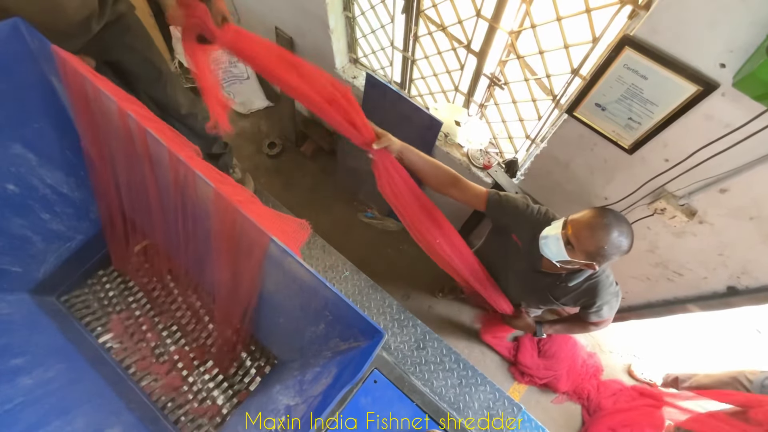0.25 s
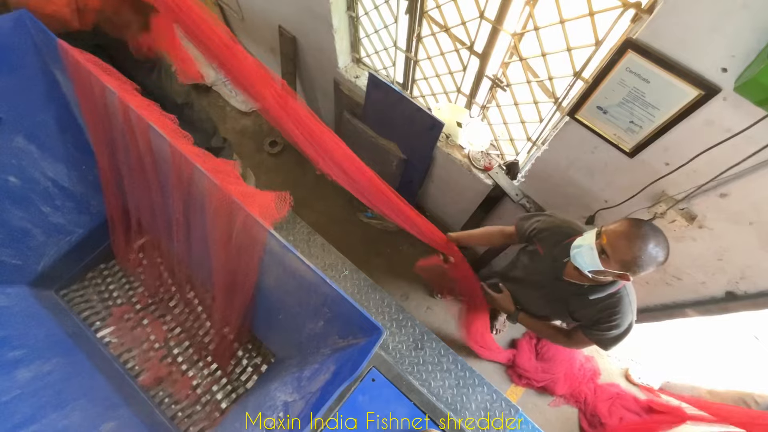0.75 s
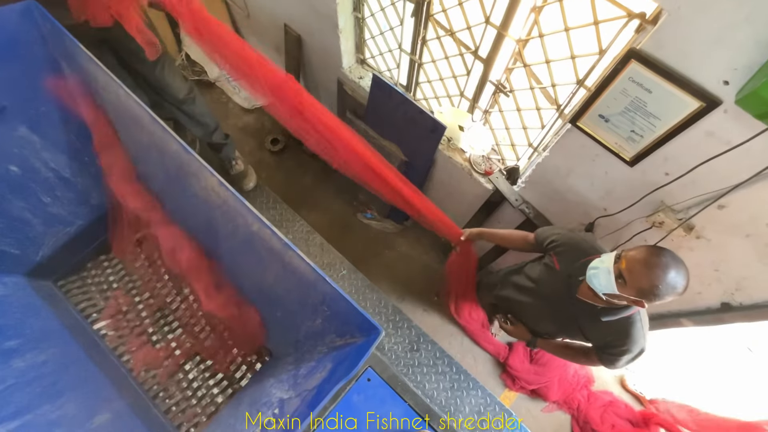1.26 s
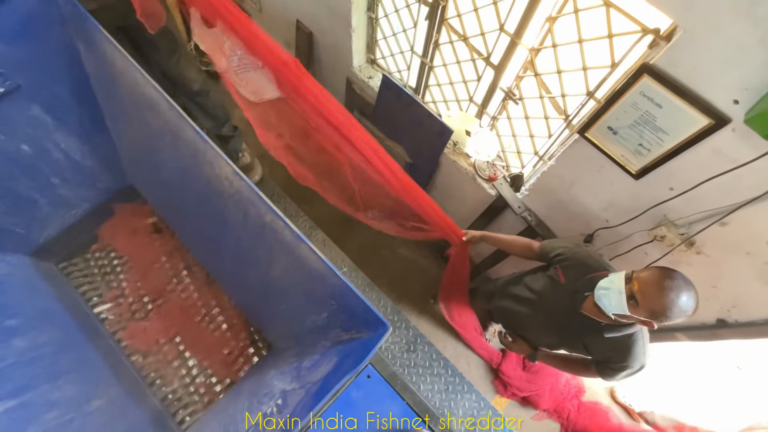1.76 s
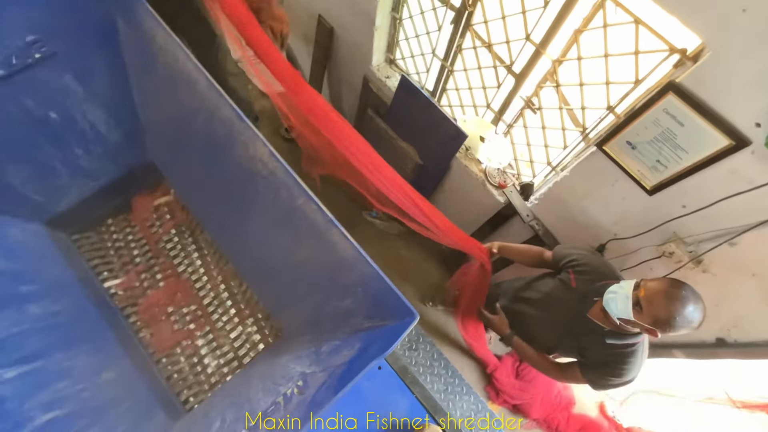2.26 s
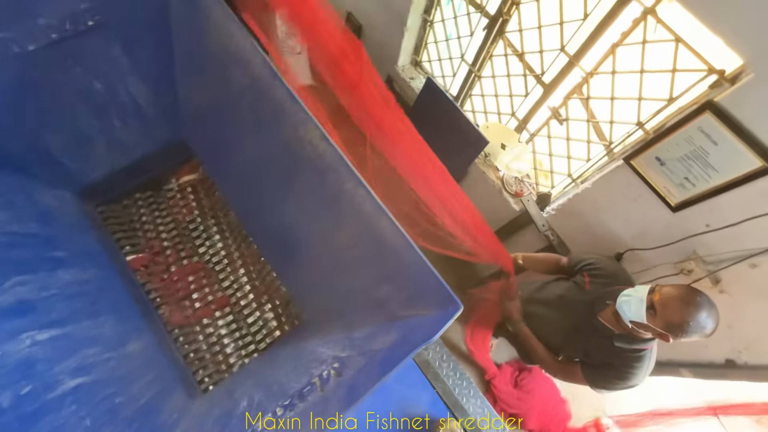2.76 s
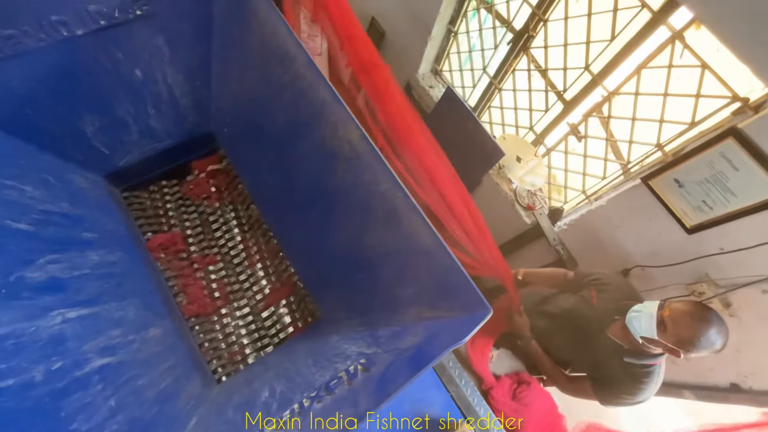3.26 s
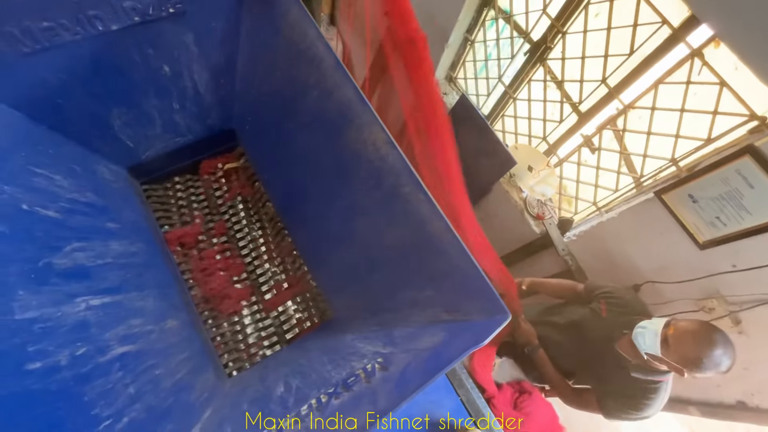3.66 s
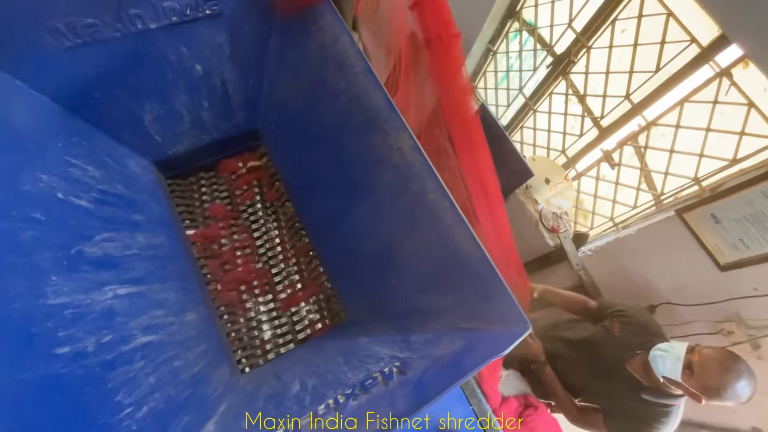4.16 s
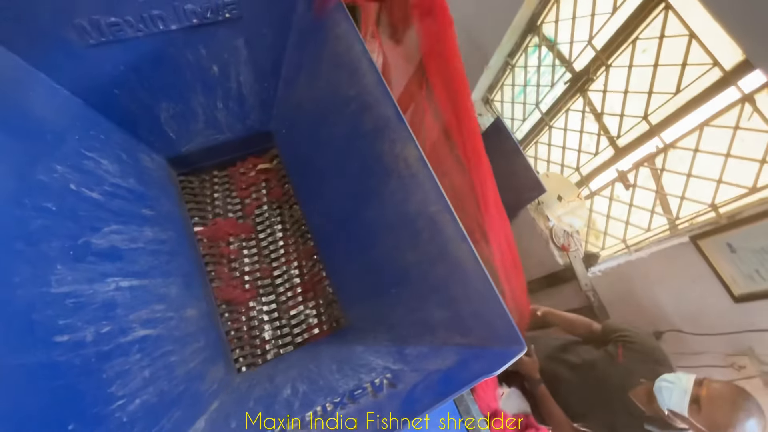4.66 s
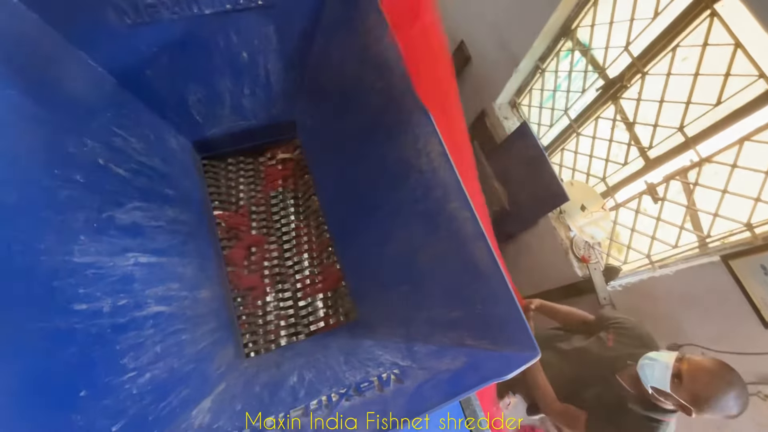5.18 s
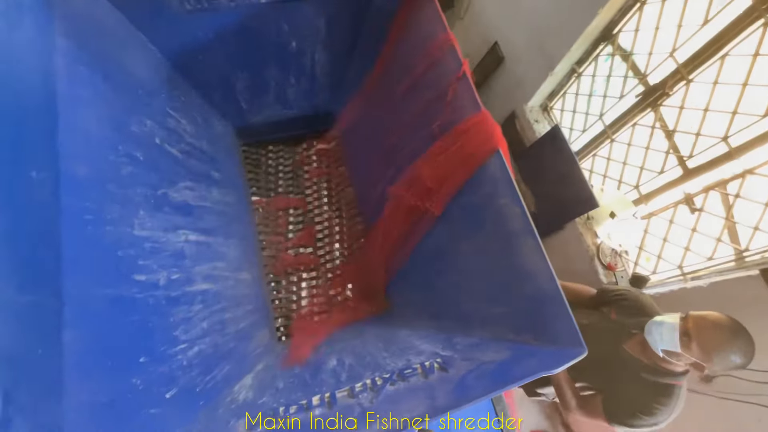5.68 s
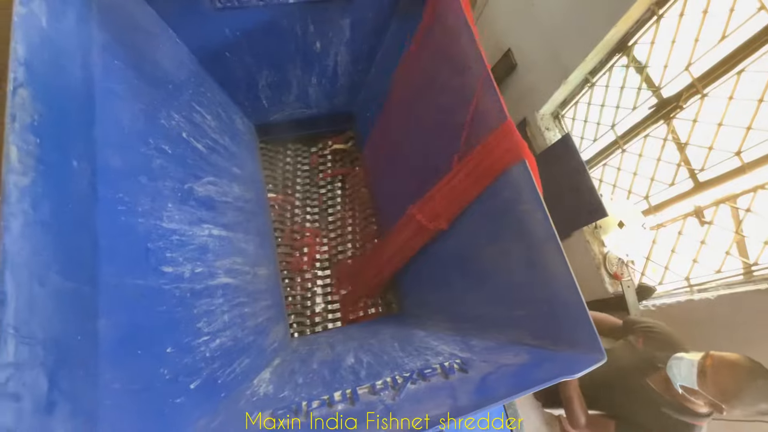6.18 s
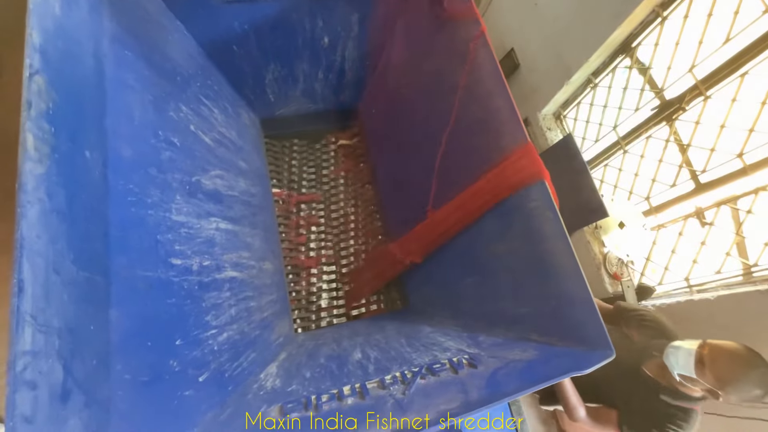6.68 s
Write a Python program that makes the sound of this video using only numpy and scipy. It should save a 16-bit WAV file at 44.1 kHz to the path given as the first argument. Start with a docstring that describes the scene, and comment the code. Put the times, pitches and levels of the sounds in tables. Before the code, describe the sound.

An industrial shredder drones low and throbs unevenly, scraping and chopping nylon netting under a faint, buzzing high whine, with knocks and small snaps.

```python
"""A twin-shaft shredder runs in a small workshop, heard from just above its steel hopper.
Wandering sines make the gearbox drone, throb and sing; shaped noise and decaying modes make the walls
rumble and knock. Evenly spaced tones near 5 kHz make the motor drive whine.
Nylon netting dragged over the rim hisses and crackles as noise and clicks; now and then a strand snaps."""
import sys
import numpy as np
from scipy import signal
from scipy.fft import rfft, irfft
from scipy.io import wavfile
from scipy.ndimage import map_coordinates

SR = 44100
rng = np.random.default_rng(int(sys.argv[2]) if len(sys.argv) > 2 else 0)


def persist_wave(psi):
    """Save psi, clipped to +-1, as 16-bit WAV."""
    counts = np.round(np.clip(psi, -1, 1) * 32767).astype(np.int16)
    wavfile.write(sys.argv[1], SR, np.atleast_2d(counts).T)


N = 305604
TIME = np.arange(N) / SR
BINS_HZ = np.fft.rfftfreq(N, 1 / SR)

DRONE_HZ, SLOT_HZ = 108, 714
SWITCH_HZ, SPACING_HZ = 5039.7, 80.7
BAND_LIMIT_HZ = 15800

# Throbs of the drone. Each row: centre in seconds, relative peak in dB.
THROBS = [(0.118, -20), (0.16, -12), (0.247, -8), (0.416, -16), (0.495, -16), (0.642, -16), (0.926, -16.5),
          (1.014, -15), (1.103, -12), (1.553, -14), (1.654, -11.5), (1.702, -10.5), (1.85, -12),
          (1.951, -9), (2.022, -17), (2.109, -10.5), (2.179, -23), (2.422, -15), (2.467, -14.0),
          (2.557, -19), (2.671, -12), (2.729, -11), (2.822, -8.5), (2.885, -8), (2.972, -23), (3.083, -19),
          (3.143, -14.5), (3.186, -20), (3.23, -15), (3.274, -14), (3.319, -14), (3.413, -7.5),
          (3.497, -17), (3.554, -11.5), (3.63, -10), (3.684, -11.0), (3.791, -9.5), (3.881, -12),
          (4.031, -13.5), (4.096, -27), (4.143, -9), (4.274, -14), (4.434, -16.0), (4.477, -12.5),
          (4.571, -9.5), (4.803, -9.5), (4.881, -10.5), (4.983, -12.5), (5.069, -8.5), (5.172, -11.5),
          (5.238, -12.0), (5.34, -10.5), (5.514, -18), (5.584, -22), (5.627, -16), (5.878, -17),
          (5.922, -20), (6.032, -11.5), (6.087, -12), (6.132, -18), (6.204, -14.0), (6.245, -13.5),
          (6.329, -15), (6.383, -10.5), (6.473, -14.5), (6.584, -19), (6.724, -10.5), (6.789, -16),
          (6.836, -18), (6.91, -12.5)]
# Hollow boom of the hopper. Each row: frequency in Hz, relative density in dB.
BOOM_COLOUR = [(28, -22), (52, -8.5), (75, 2), (100, 6.5), (126, 6), (170, 1), (300, -80)]
# Load on the cutters, driving rumble, grind and low gears. Each row: time in seconds, relative level in dB.
LOAD = [(0, -18.5), (.8, -21.5), (1.55, -19), (1.9, -18.5), (2.4, -19), (2.65, -19), (3.45, -17.5),
        (3.7, -20), (4.5, -21), (5.35, -24.5), (5.8, -25.5), (6.05, -20.5), (6.4, -22.5), (6.92, -23)]
# Tones of the gear train. Each row: frequency in Hz, level in dB before waver and load.
GEAR_TONES = [(97.7, -30), (117.8, -28), (126.9, -25.5), (164, -36.5), (193.7, -32.5), (293.8, -40.5),
              (319, -35.5), (350, -35), (484, -43), (892, -43)]
# Slot tone of the motor. Each row: time in seconds, relative level in dB.
SLOT_LEVEL = [(0, -40), (.8, -40.5), (2.08, -38.5), (2.5, -46.5), (3.65, -34), (4.45, -40.5), (4.7, -50),
              (5.8, -48), (6.35, -39), (6.92, -51.5)]
# Shaking walls. Each row: frequency in Hz, relative density in dB.
RUMBLE_COLOUR = [(90, -23), (150, -2.5), (225, 0), (270, -4), (335, -1.5), (390, -5.5), (470, -3.5),
                 (560, -13.5), (700, -31), (1200, -88)]
# Scraping and chopping. Each row: frequency in Hz, relative density in dB.
GRIND_COLOUR = [(350, -15.5), (600, 3), (800, 0.5), (1100, -3.5), (1350, -3), (1880, -3), (2900, -5),
                (4200, -12.5), (6500, -11.5), (9000, -18.5), (15500, -98)]
# Teeth dragging through netting. Each row: centre in seconds, swell of the grinding in dB.
SCRAPES = [(.59, 3.5), (1.93, 5), (2.43, 4.5), (2.747, 3.5), (3.22, 2.5), (3.54, 2), (6.377, 3.5)]
# Ringing of the cutter discs. Each row: frequency in Hz, width between -6 dB points in Hz, relative level in dB.
DISC_RINGS = [(1311, 27, -49), (1722, 180, -43.5), (2236, 32, -51.5), (3300, 1000, -44)]
# A thick wad churning between the shafts. Each row: time in seconds, level in dB.
CHURN_LEVEL = [(2.48, -56), (2.6, -21), (3.02, -25.5), (3.45, -25), (4.5, -33), (4.8, -56)]
# Its resonances. Each row: frequency in Hz, width between -6 dB points in Hz, relative level in dB.
CHURN_RINGS = [(156, 68, 0), (196, 61, -8), (330, 81, -7.5)]
# Bundles of strands giving way. Each row: start in seconds, level at onset in dB.
CRUNCHES = [(2.562, -26.5), (3.357, -23.5)]
# Cutters knocking. Each row: start in seconds, relative level in dB, most excited frequency in Hz.
KNOCKS = [(1.636, -15, 200), (1.828, -8, 200), (3.39, -12, 332), (3.549, -10.5, 410)]
# Modes of the hopper walls. Each row: frequency in Hz, relative level in dB, 60 dB decay in seconds.
HOPPER_MODES = [(111, -4, 0.18), (176, 6.5, 0.087), (221, 8, 0.12), (369, 7, 0.053), (522, 2, 0.034)]
# Strands squeaking between the cutters. Each row: start in seconds, mean pitch in Hz, length in seconds,
# relative level in dB.
SQUEAKS = [(2.557, 1880, 0.05, -31.5), (3.356, 1160, 0.053, -33.5), (5.4, 1730, 0.28, -45)]
# Strands snapping. Each row: start in seconds, relative level in dB.
SNAPS = [(0.757, -25), (1.089, -16), (1.245, -19), (1.341, -23), (2.699, -23), (4.12, -27), (6.511, -20),
         (6.622, -21)]
# Netting sliding over steel. Each row: time in seconds, relative level in dB.
SLIDE = [(0, -39), (1.2, -38), (1.9, -32), (2.3, -30.5), (2.55, -39), (3, -42.5), (4.9, -43.5),
         (5.35, -47.5), (5.8, -45), (5.95, -32.5), (6.5, -35.5), (6.92, -35)]
# Hiss of the threads. Each row: frequency in Hz, relative density in dB.
HISS_COLOUR = [(1200, -41), (2500, 2), (3300, -6), (4300, 7.5), (6000, 8.5), (7800, 11), (9800, 10),
               (11800, 6.5), (15700, 4)]
# Drive tones, low to high; the middle three are the main ones and swell and fade in the standing waves
# of the room. Each row: time in seconds, relative level in dB.
WHINE_BOTTOM = [(3.3, -55), (4.05, -45), (5.4, -50), (5.9, -55)]
WHINE_LOW = [(0, -50), (1.5, -52), (1.72, -38.5), (2.1, -36.5), (2.3, -47), (2.93, -36.5), (3.3, -41.5),
             (3.72, -51), (3.98, -39), (4.38, -32.5), (4.72, -47), (5.38, -39), (5.62, -51), (5.85, -42),
             (6.3, -34), (6.92, -59)]
WHINE_MIDDLE = [(0, -43), (1, -44), (1.98, -37), (2.19, -39), (2.32, -35), (2.62, -43), (2.8, -41),
                (2.98, -50), (3.42, -55), (3.66, -34), (4.25, -40.5), (4.8, -36), (5.3, -47), (5.62, -58),
                (5.92, -35), (6.33, -36), (6.92, -55)]
WHINE_HIGH = [(0, -37.5), (.75, -35.5), (1.45, -38), (1.63, -53), (1.8, -35.5), (2.14, -39), (2.3, -54),
              (3, -50), (3.15, -35.5), (3.42, -34), (3.65, -44), (4.25, -51), (4.95, -38.5), (5.5, -42.5),
              (5.65, -51)]
WHINE_TOP = [(0, -43), (1.4, -54), (2.68, -42.5), (3.9, -50), (5.8, -57), (6.15, -45)]
# Weaker tones of the drive. Each row: frequency in Hz, relative level in dB.
SIDEBANDS = [(4878, -52.5), (5201, -49)]
# Likeness of the two microphone ports. Each row: frequency in Hz, coherence from 0 to 1.
MACHINE_SAME = [(110, 0.98), (220, 0.96), (330, 0.73), (600, 0.38), (950, 0.22), (2000, 0.39), (2700, 0.64),
                (5000, 1), (15000, 1)]
NET_SAME = [(2000, .75), (7000, .8), (8600, 1), (15000, .97)]
# Lead of the left port, negative where the right leads. Each row: frequency in Hz, phase in radians.
LEAD = [(500, 0), (760, -3), (1100, -6.1), (1500, -6.5), (2100, -7.5), (3000, -10.9), (4500, -13.5),
        (5800, -13.4), (7500, -14.3), (8700, -15.6), (10900, -15.8), (12600, -18.5)]
# Balance of the ports. Each row: time in seconds, left over right in dB.
BALANCE = [(0, 0.9), (6.92, -0.1)]


def drone(hum_db=-21.5, throb_db=-1.5, throb_s=0.017, throb_hz=111, scatter=0.063,
          boom_db=-28.0, wander_rad=0.97):
    """The main gear mesh hums; each throb swells it at a slightly different pitch, over a hollow boom."""
    mesh = 2 * np.pi * DRONE_HZ * TIME + wander_rad * drift(1)
    hum = gain_of(hum_db) * np.sin(mesh)
    for (s, db), chance in zip(THROBS, rng.standard_normal(len(THROBS))):
        near = abs(TIME - s) < 4 * throb_s
        t = TIME[near] - s
        off_hz = throb_hz * (1 + scatter * chance) - DRONE_HZ
        swell = gain_of(db + throb_db) * np.exp(-.5 * (t / throb_s) ** 2)
        hum[near] += swell * np.sin(mesh[near] + 2 * np.pi * off_hz * t)
    boom = ports(rng.standard_normal((2, N)), BOOM_COLOUR, MACHINE_SAME)
    return hum + gain_of(boom_db) * boom


def gears(wander_rad=0.99, waver_db=2.0, load_share=0.94,
          slot_db=4.5, slot_waver_db=2.5, slot_wander_rad=2.4):
    """Gear tones waver; the low ones grow under load, and the motor's slot tone sings with a blurred pitch."""
    load = evened(follow(LOAD, load_share))
    tones = 0
    for hz, db in GEAR_TONES:
        level = gain_of(db + waver_db * drift(3.1)) * (load if hz < 2 * DRONE_HZ else 1)
        tones = tones + level * tone(hz, wander_rad, 0.97, lead_at(hz))
    slot_level = follow(SLOT_LEVEL) * gain_of(slot_db + slot_waver_db * drift(16))
    return tones + slot_level * tone(SLOT_HZ, slot_wander_rad, 6.9, 0.86)


def cutters(rumble_db=-26.5, grind_db=-29.0, grind_share=0.48, flutter_db=2.0, scrape_s=0.023,
            chips_per_s=700, spread_db=3.5, clumps_db=2.5, clump_s=.022, clump_hz=400):
    """The discs scrape past each other and ring, chop threads in a clumpy clatter and shake the walls."""
    scrape_db = sum(db * np.exp(-.5 * ((TIME - s) / scrape_s) ** 2) for s, db in SCRAPES)
    rumble = ports(rng.standard_normal((2, N)), RUMBLE_COLOUR, MACHINE_SAME)
    rumble = rumble * gain_of(rumble_db + flutter_db * drift(6.9) + scrape_db / 2)
    chopping = rng.standard_normal((2, N)) + sparse(chips_per_s, spread_db) / 2
    grind = gain_of(grind_db + scrape_db) * ports(chopping, GRIND_COLOUR, MACHINE_SAME)
    grind = patchy(grind + discs(), clumps_db, clump_s, clump_hz)
    return evened(follow(LOAD)) * rumble + evened(follow(LOAD, grind_share)) * grind


def discs():
    """Rubbing, as noise, keeps the resonant steel discs ringing."""
    rubbing = rfft(rng.standard_normal(N))
    rings = 0
    for hz, width_hz, db in DISC_RINGS:
        resonance = 1 / (1 + (2 * (BINS_HZ - hz) / width_hz) ** 2)
        rings = rings + gain_of(db) * evened(irfft(rubbing * resonance, N))
    return placed(rings)


def churn(tugs_per_s=260):
    """The teeth tug at a thick wad in quick, uneven jerks that shake the hopper resonances."""
    tugs = rfft(sparse(tugs_per_s, 0)[0])
    body = 0
    for hz, width_hz, db in CHURN_RINGS:
        resonance = 1 / (1 + 2j * (BINS_HZ - hz) / width_hz) ** 2
        body = body + gain_of(db) * evened(irfft(tugs * resonance, N))
    return placed(follow(CHURN_LEVEL) * evened(body))


def crunches(decay_s=0.047):
    """A bundle of strands gives way at once in a dense, decaying burst of clicks."""
    level = sum(gain_of(db) * (TIME > s) * np.exp(-abs(TIME - s) / decay_s) for s, db in CRUNCHES)
    band = signal.butter(2, [700, 3400], "band", fs=SR, output="sos")
    return placed(level * evened(signal.sosfilt(band, sparse(900, 2)[0])))


def knocks(rise_s=0.002, crunch_db=-15, crunch_s=0.017, focus_db=7):
    """A cutter catches with a short crunch and the walls ring, most strongly near one pitch."""
    t, out = TIME[:SR // 3], np.zeros(N)
    dull = signal.butter(1, [200, 700], "band", fs=SR, output="sos")
    for s, level_db, centre_hz in KNOCKS:
        ring = 0
        for hz, db, t60_s in HOPPER_MODES:
            mode_db = db - focus_db * np.log2(hz / centre_hz) ** 2 - 60 * t / t60_s
            ring = ring + gain_of(mode_db) * np.sin(2 * np.pi * hz * t)
        crunch = evened(signal.sosfilt(dull, rng.standard_normal(len(t))))
        crunch = gain_of(crunch_db) * crunch * np.exp(-t / crunch_s)
        add(out, s, gain_of(level_db) * (ring / 2 + crunch) * (1 - np.exp(-t / rise_s)))
    return placed(out)


def squeaks():
    """Taut nylon slips on steel: a short tone, rough in pitch and broken in level."""
    out = np.zeros(N)
    for s, hz, length_s, db in SQUEAKS:
        count = int(length_s * SR)
        pitch_hz = hz * (1 + .08 * drift(200)[:count])
        slips = evened(gain_of(5 * drift(70)[:count]))
        envelope = 2 * gain_of(db) * signal.windows.tukey(count) * slips
        add(out, s, envelope * np.sin(2 * np.pi * np.cumsum(pitch_hz) / SR))
    return placed(out)


def snaps(level_db=-5, crack_s=0.0049, tail_s=0.013, tail_db=-14, low_hz=6500):
    """A strand breaks: high-passed noise with a fast crack and a weaker, slower tail."""
    t, out = TIME[:SR // 16], np.zeros(N)
    shape = np.exp(-t / crack_s) + gain_of(tail_db) * np.exp(-t / tail_s)
    for s, db in SNAPS:
        add(out, s, gain_of(db + level_db) * shape * rng.standard_normal(len(t)))
    return placed(signal.sosfilt(signal.butter(2, low_hz, "high", fs=SR, output="sos"), out))


def netting(hiss_db=1.5, crackle_db=-6.5, knots_per_s=500, spread_db=7.5, flicker_db=1.6):
    """Countless threads hiss over the steel, and the knots tick as they catch."""
    threads = gain_of(hiss_db) * ports(rng.standard_normal((2, N)), HISS_COLOUR, NET_SAME)
    knots = gain_of(crackle_db) * ports(sparse(knots_per_s, spread_db), HISS_COLOUR, NET_SAME)
    return follow(SLIDE) * gain_of(flicker_db * drift(19.0)) * (threads + knots)


def whine(flutter_db=1.5, ports_db=3, wander_rad=0.82, stray_rad=.4, apart_rad=.7, waver_db=3.5):
    """Switching tones wander together, so their even spacing beats as a buzz; the room favours each in turn."""
    lead, shared = lead_at(SWITCH_HZ), wander_rad * drift(1)
    tones = [(SWITCH_HZ - 3 * SPACING_HZ, WHINE_BOTTOM), (SWITCH_HZ - SPACING_HZ, WHINE_LOW),
             (SWITCH_HZ, WHINE_MIDDLE), (SWITCH_HZ + SPACING_HZ, WHINE_HIGH),
             (SWITCH_HZ + SLOT_HZ, WHINE_TOP)]
    out = 0
    for hz, rows in tones:
        tilt_db = ports_db * np.outer([.5, -.5], drift(0.85))  # left against right
        level = follow(rows) * gain_of(flutter_db * drift(13) + tilt_db)
        out = out + level * tone(hz, stray_rad, 1.6, lead, shared, apart_rad)
    for hz, db in SIDEBANDS:
        out = out + gain_of(db + waver_db * drift(2.9)) * tone(hz, 1, 2.5, lead)
    return np.sqrt(2) * out  # levels as rms


def tone(hz, wander_rad, wander_hz, lead_rad, shared_rad=0, apart_rad=1.0):
    """A wandering sine; standing waves in the room keep shifting its phase between the ports."""
    phase = 2 * np.pi * hz * TIME + shared_rad + wander_rad * drift(wander_hz)
    shift = apart_rad * min(hz / SLOT_HZ, 1) * drift(0.65)
    return np.sin([phase, phase - lead_rad + shift])


def sparse(per_s, spread_db):
    """Two trains of random clicks of rms 1; a larger spread leaves most small and a few large."""
    size = gain_of(spread_db * np.minimum(rng.exponential(1, (2, N)), 4))
    return evened(size * rng.choice([-1, 1], (2, N)) * (rng.random((2, N)) < per_s / SR))


def patchy(pair, depth_db, patch_s, patch_hz):
    """Swells and dips that come and go separately in each part of the spectrum."""
    hz, t, spectrum = signal.stft(pair, SR, nperseg=512, noverlap=384)
    field = rng.standard_normal((200, 600))
    where = np.meshgrid(hz / patch_hz, t / patch_s, indexing="ij")
    swell_db = depth_db * map_coordinates(field, where, order=1, mode="mirror")
    return signal.istft(spectrum * gain_of(swell_db), SR, nperseg=512, noverlap=384)[1][:, :N]


def ports(pair, colour, likeness):
    """Colours two unrelated signals and blends them into what the two microphone ports hear."""
    direct, diffuse = rfft(pair)
    same = np.clip(at_bins(likeness), 0, 1)
    right = (same * direct + np.sqrt(1 - same ** 2) * diffuse) * np.exp(-1j * at_bins(LEAD))
    return evened(irfft(np.array([direct, right]) * gain_of(at_bins(colour)), N))


def placed(x):
    """A single source in the hopper, reaching the right port first."""
    return np.array([x, irfft(rfft(x) * np.exp(-1j * at_bins(LEAD)), N)])


def lead_at(hz):
    """Lead of the left port at one frequency, in radians."""
    return np.interp(hz, *np.transpose(LEAD))


def drift(width_hz):
    """Slow random curve of rms 1: noise at 1000 points a second under a Gaussian low-pass."""
    window = signal.windows.gaussian(2001, 1000 / (2 * np.pi * width_hz))
    noise = signal.oaconvolve(rng.standard_normal(12000), window, "valid")
    return evened(np.interp(TIME, np.arange(len(noise)) / 1000, noise))


def follow(rows, share=1):
    """A dB curve as a gain over time; share scales how strongly a layer answers it."""
    return gain_of(share * np.interp(TIME, *np.transpose(rows)))


def at_bins(points):
    """A table over frequency, interpolated on a log axis at every bin."""
    hz, value = np.transpose(points)
    return np.interp(np.log(BINS_HZ + 1), np.log(hz + 1), value)


def add(mix, s, sound):
    """Lays a sound into the mix at s seconds."""
    part = mix[round(s * SR):][:len(sound)]
    part += sound[:len(part)]


def evened(x):
    """Scales to rms 1."""
    return x / np.sqrt(np.mean(x ** 2) + 1e-20)


def gain_of(db):
    """Decibels to amplitude."""
    return 10 ** (np.asarray(db) / 20)


def scene():
    """The machine and the netting together."""
    machine = drone() + gears() + cutters() + churn() + knocks() + whine()
    return machine + crunches() + squeaks() + snaps() + netting()


def record(dry):
    """The balance of the two ports, then the band limit."""
    left = np.sqrt(follow(BALANCE))
    heard = dry * np.array([left, 1 / left])
    low_pass = signal.firwin(511, BAND_LIMIT_HZ, window=("kaiser", 9), fs=SR)
    return signal.oaconvolve(heard, low_pass[None], "same")


dry = scene()
out = record(dry)
persist_wave(out)
```